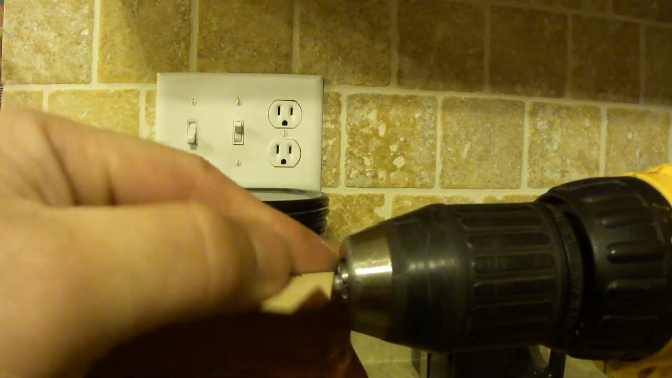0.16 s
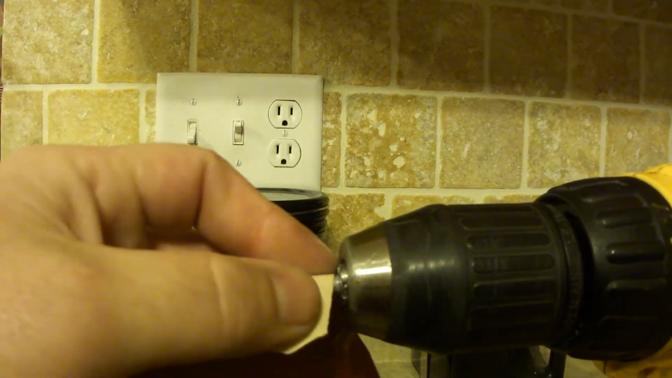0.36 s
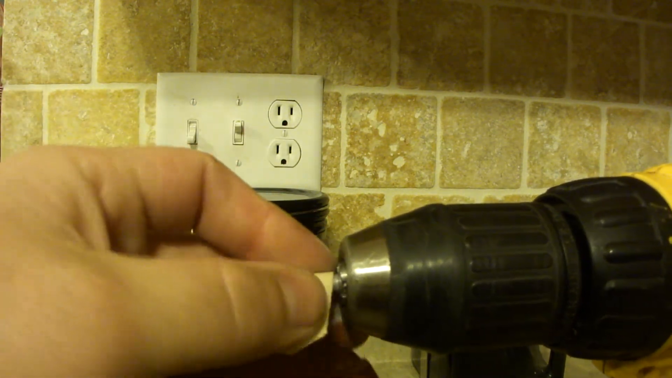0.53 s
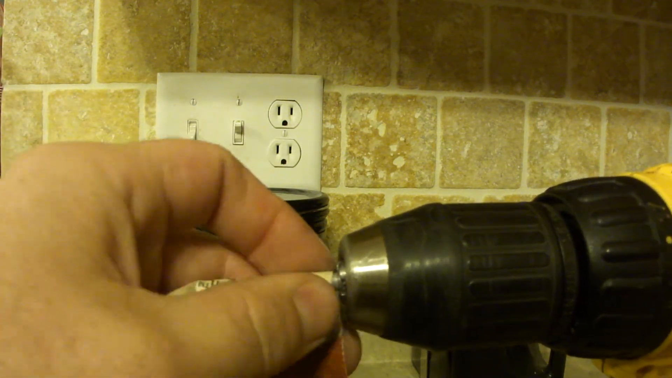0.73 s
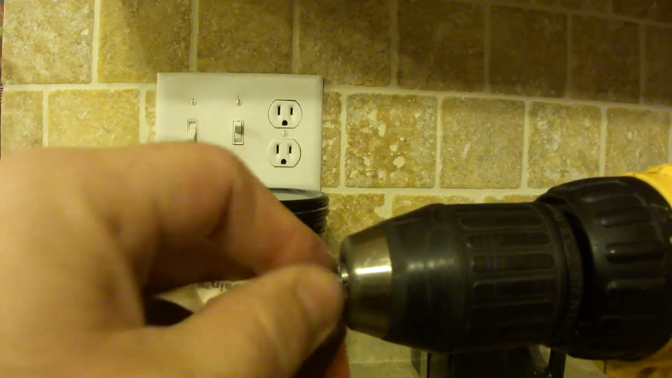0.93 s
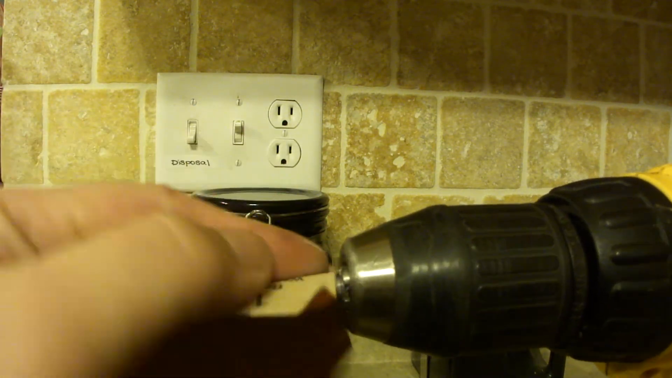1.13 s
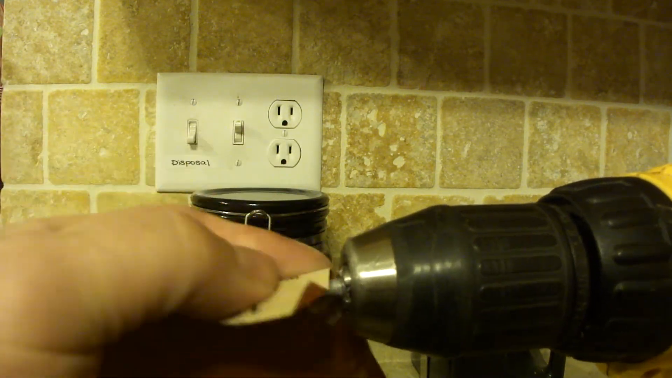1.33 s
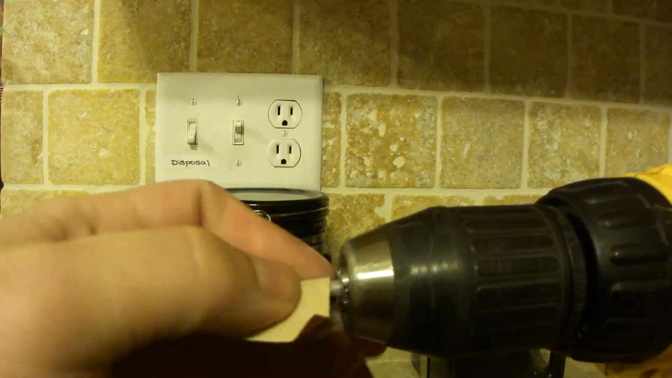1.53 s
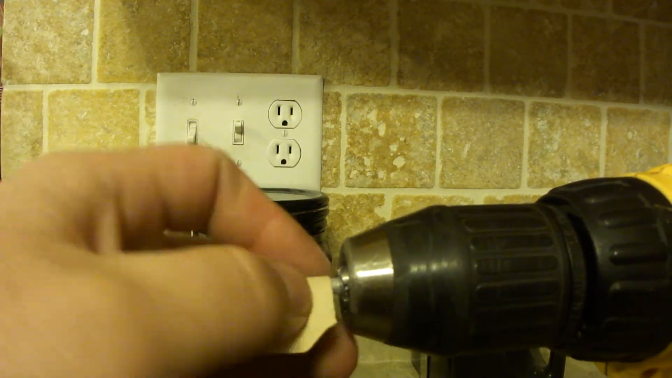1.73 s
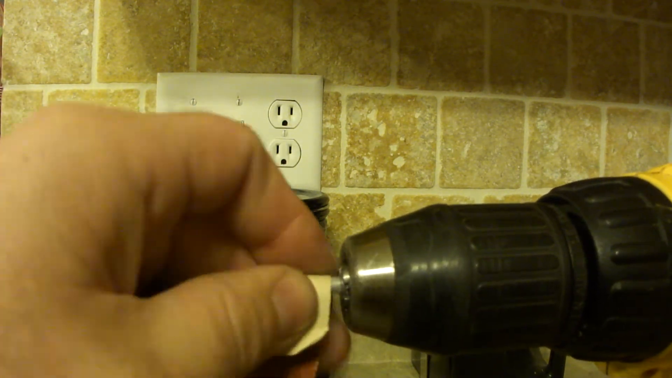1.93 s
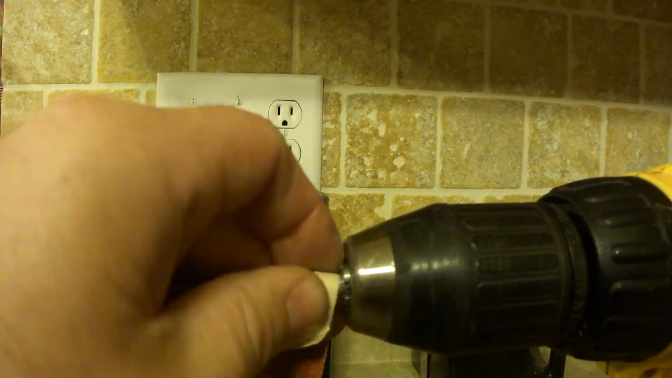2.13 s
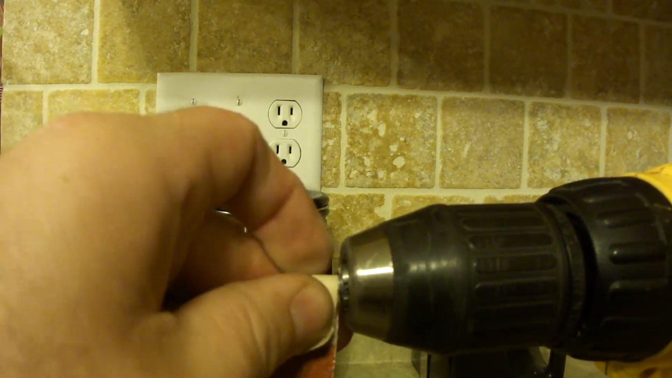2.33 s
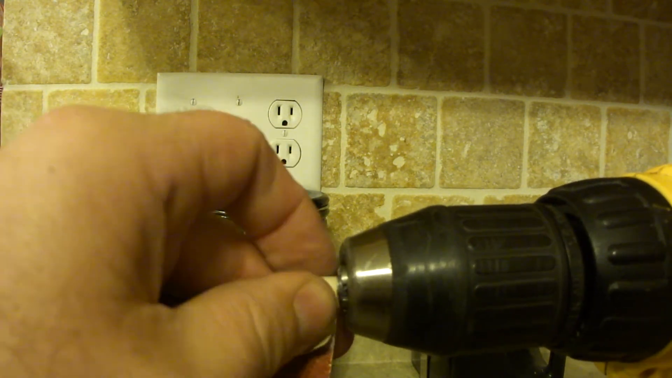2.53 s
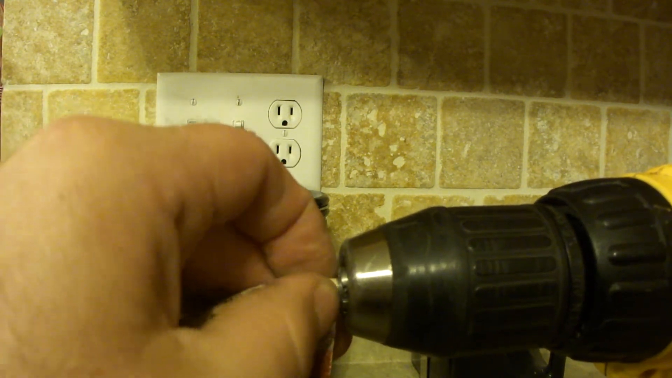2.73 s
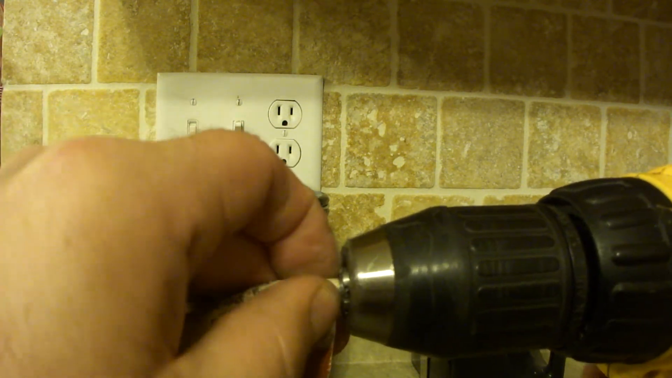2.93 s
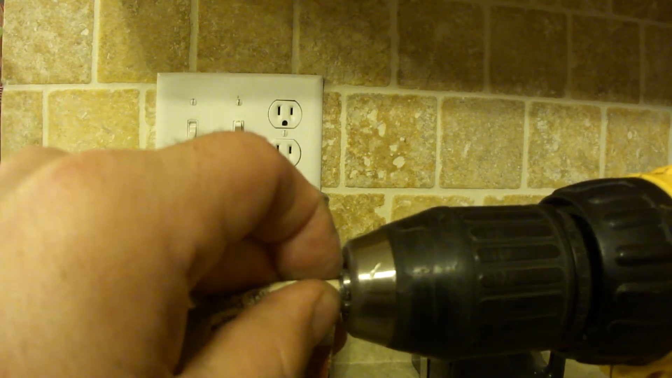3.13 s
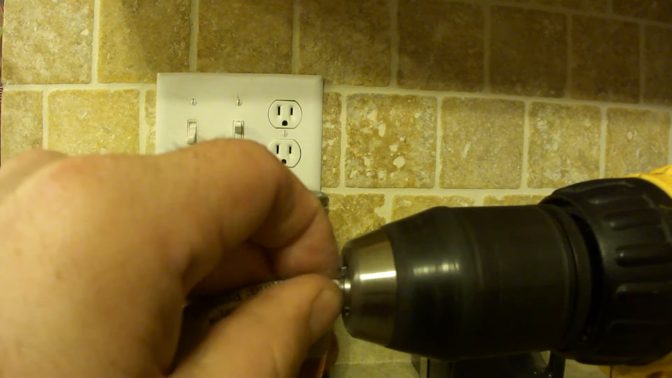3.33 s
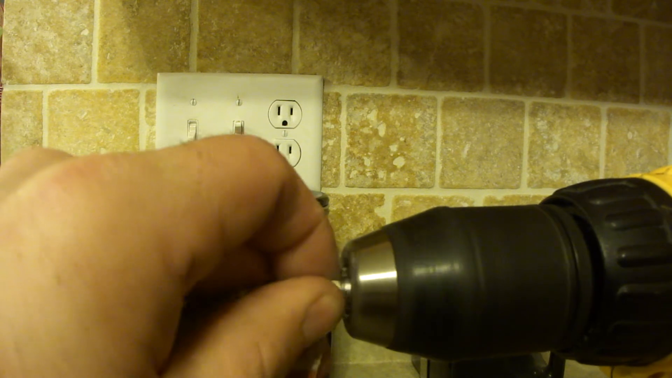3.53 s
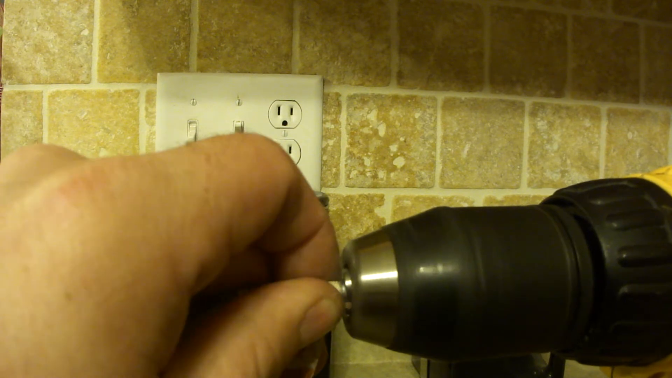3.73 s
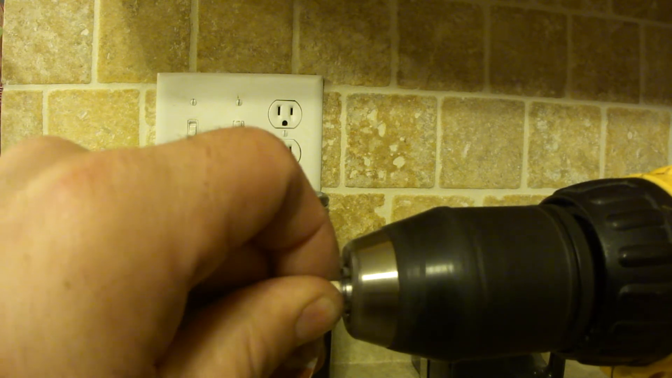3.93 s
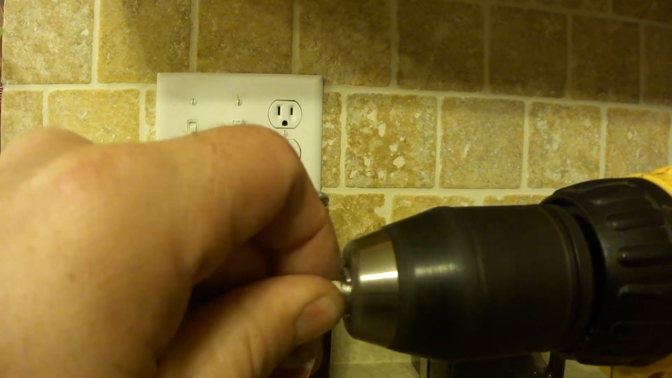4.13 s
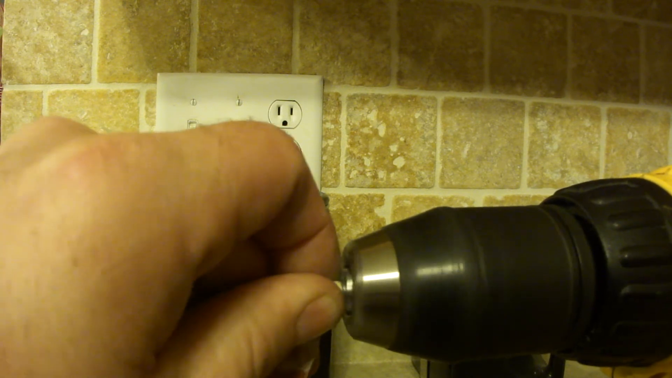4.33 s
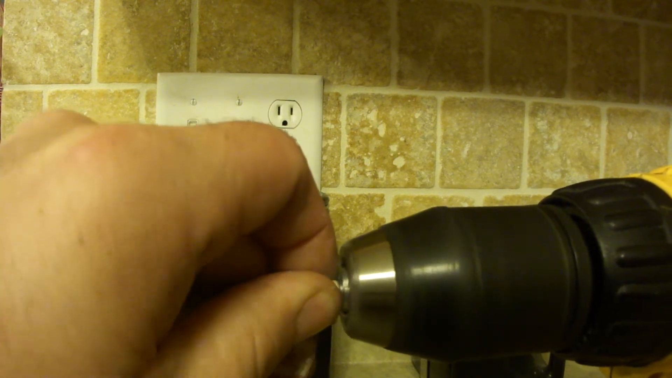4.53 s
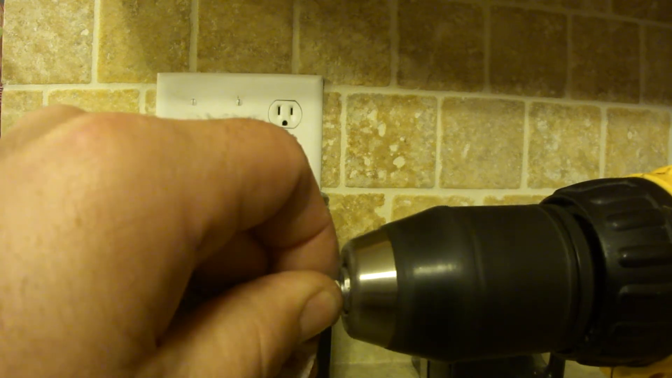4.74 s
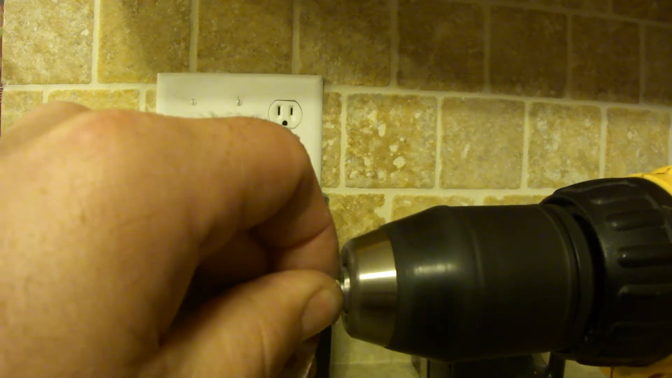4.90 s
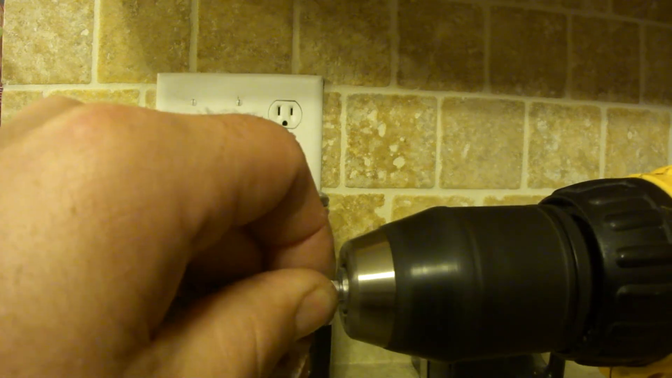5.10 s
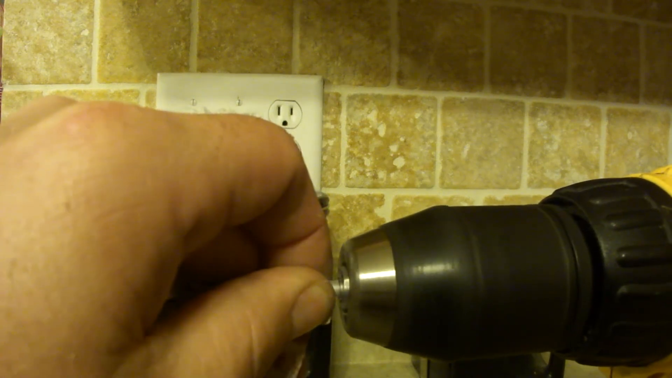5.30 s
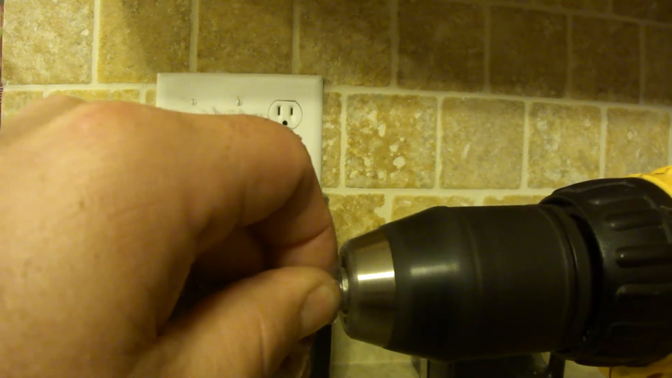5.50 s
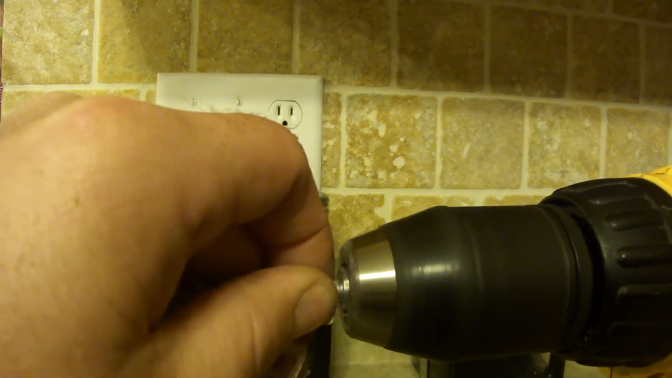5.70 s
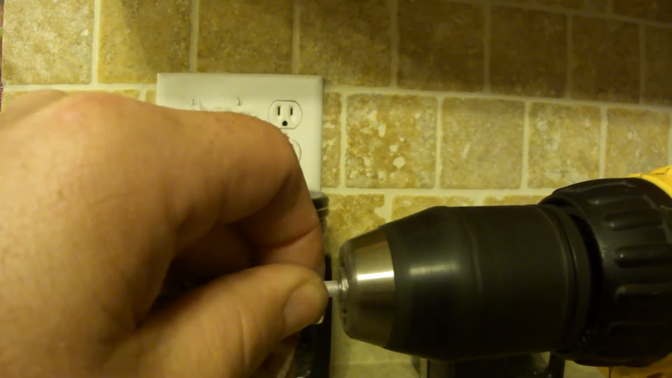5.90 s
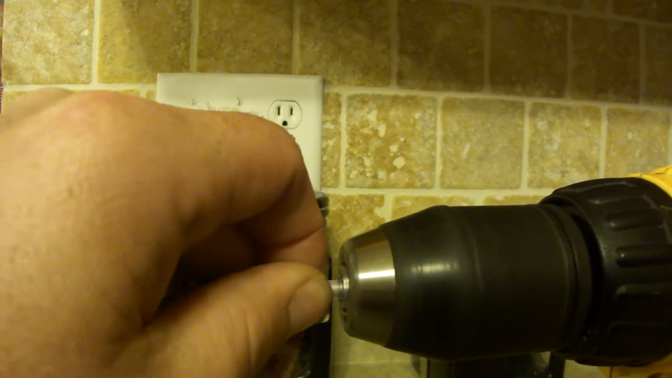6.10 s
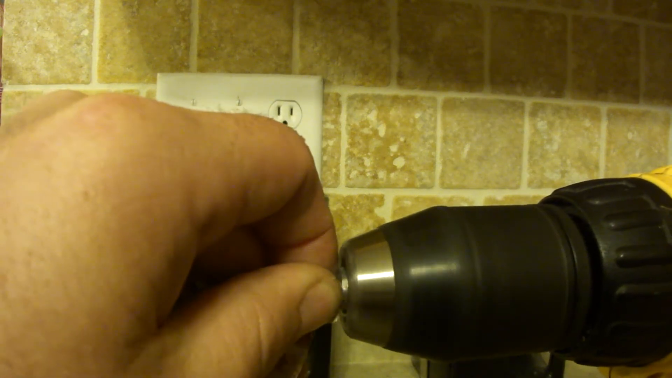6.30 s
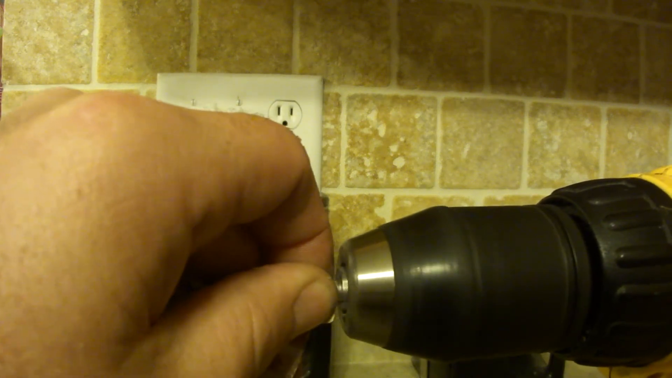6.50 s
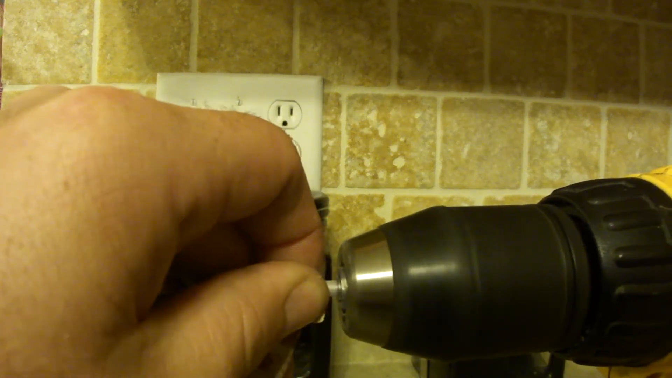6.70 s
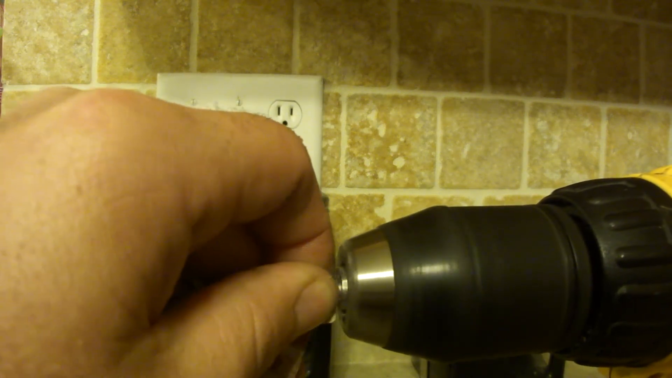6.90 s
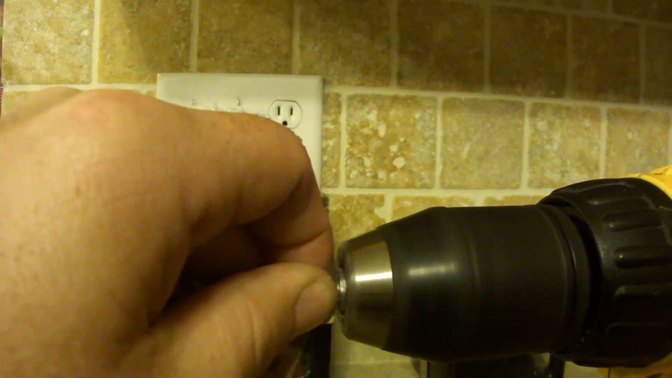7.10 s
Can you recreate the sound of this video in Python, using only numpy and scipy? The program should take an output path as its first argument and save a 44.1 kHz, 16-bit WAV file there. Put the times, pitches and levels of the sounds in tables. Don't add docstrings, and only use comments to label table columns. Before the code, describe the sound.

Sandpaper rustles, scratches and snaps in fingers close up, then a cordless drill clicks, rattles and whines up in steps to full speed.

```python
import sys
import numpy as np
from scipy import signal
from scipy.fft import rfft, irfft, next_fast_len
from scipy.io import wavfile
from scipy.ndimage import uniform_filter1d

SR = 44100
rng = np.random.default_rng(int(sys.argv[2]) if len(sys.argv) > 2 else 0)


def wrap_up_sound(samples):
    columns = np.atleast_2d(samples).T
    tamed = np.clip(columns, -1, 1)
    steps = np.round(tamed * 32767).astype(np.int16)
    wavfile.write(sys.argv[1], SR, steps)


def to_linear_factor(level_db):
    exponent = np.asarray(level_db, float) / 20
    return 10 ** exponent


N = 315438
TIME = np.arange(N) / SR
START_S = 3.255
PORTS = np.array([[.5], [-.5]])

# frequency in Hz, level in dB per Hz.
PAPER = [(60, -63), (200, -11), (400, -7.5), (800, -4), (1400, 0), (2200, -4.5), (2800, 3), (4000, -2.5),
         (5500, -34)]
# frequency in Hz, gain in dB.
MIC = [(40, -13.5), (200, 8.5), (2300, 3), (2600, -5.5), (2850, -17.5), (3700, -14), (4550, -4), (5250, -1),
       (5600, 7), (10000, 18.5), (11000, 8), (11650, -11.5), (11800, -56), (16000, -63)]


def unit(x):
    return x / np.sqrt(np.mean(x ** 2) + 1e-20)


def along(points, hz):
    f, *v = np.transpose(points)
    return np.squeeze([np.interp(np.log(hz + 1), np.log(f + 1), c) for c in v])


def curves(rows, fade=0.0069):
    s, *cols = np.transpose(rows)
    gate = np.clip(np.minimum(TIME - s[0], s[-1] + 3 * fade - TIME) / fade, 0, 1)
    return [np.interp(TIME, s, c) for c in cols] + [gate]


def wobble(rate):
    knots = rng.standard_normal(int(N * rate / SR) + 2)
    return np.interp(TIME * rate, np.arange(len(knots)), knots)


def filtered(x, response):
    m = next_fast_len(N + 8192)
    return irfft(rfft(x, m) * response(np.fft.rfftfreq(m, 1 / SR)), m)[..., :N]


def resonance(f, center, width):
    return 1j * f * width / (center * center - f * f + 1j * f * width)


def hiss(spectrum, grain_db=0):
    grains = to_linear_factor(grain_db * wobble(900)) * rng.standard_normal(N)
    return unit(filtered(grains, lambda hz: to_linear_factor(along(spectrum, hz))))


def sweep(hz):
    return np.sin(2 * np.pi * np.cumsum(hz) / SR)


def kitchen():
    # frequency in Hz, width in Hz, level in dB.
    hum = [(60, 39, -0.5), (120, 14, 1), (355, 48, 4.5), (395, 15, -20), (550, 60, 1), (765, 38, 6),
           (935, 26, 4), (1390, 230, -34)]
    shared, own = rng.standard_normal(N), rng.standard_normal((2, N))

    def peaks(f):
        return np.sqrt(sum(np.abs(to_linear_factor(db) * resonance(f, c, w)) ** 2 for c, w, db in hum))

    return to_linear_factor(-58) * unit(filtered(shared + 1.2 * own, peaks))


def rubbing():
    # time in seconds, pressure in dB.
    rub = [(0, -44.5), (.42, -49.5), (.7, -43), (.85, -47), (1.03, -38.5), (1.3, -48), (1.41, -38),
           (1.58, -49), (1.89, -36.5), (2.04, -50), (2.36, -54), (2.74, -50.5), (3.05, -46.5), (3.3, -39.5)]
    # frequency in Hz, level in dB per Hz.
    grit = [(2500, -46), (4000, -8), (5500, 4.5), (6600, 2), (8000, -4.5), (9500, -30), (11000, -19),
            (14000, 19.5)]
    # start in seconds, length in seconds, level in dB.
    scrapes = [(0.265, 0.062, -41), (.45, 0.079, -42.5), (.583, .034, -42), (0.651, 0.012, -41),
               (0.798, 0.075, -45.5), (1.13, 0.014, -43.5), (1.222, 0.038, -29.5), (1.265, 0.026, -32),
               (1.342, 0.11, -41), (1.495, 0.099, -42), (1.707, 0.087, -42.5), (1.82, .014, -42),
               (1.904, .05, -41), (1.99, 0.05, -43.5), (2.243, 0.066, -46.5), (2.528, 0.03, -46),
               (2.699, 0.015, -46.5), (3.113, 0.03, -45)]
    usual_db = -47
    rustle_db, moving = curves(rub, fade=0.00069)
    scratch_db = usual_db - 3.0 + 1.2 * (rustle_db - usual_db)
    clumps = 1.5 * wobble(45)
    rustle = to_linear_factor(rustle_db + clumps - 7) * hiss(PAPER, grain_db=1.0)
    scratch = to_linear_factor(scratch_db + clumps - 2.5) * hiss(grit, grain_db=3.5)
    out = moving * (rustle + scratch)

    coarse = to_linear_factor(4.3 * wobble(260) + 2.3 * wobble(60.24))
    stroking = unit(coarse * hiss(PAPER, grain_db=3.5))
    stroking = stroking + to_linear_factor(2.0) * unit(coarse * hiss(grit, grain_db=-2.5))
    for s, length, db in scrapes:
        stroke = np.sin(np.pi * np.clip((TIME - s) / length, 0, 1)).clip(0) ** 0.36
        out += to_linear_factor(db) * stroke * stroking
    return out


def dying(t, life_s):
    return to_linear_factor(-60 * t / life_s) + 1.53 * to_linear_factor(-60 * t / 0.0051)


def peaked(x):
    return x / np.abs(x).max()


def clicks():
    # start in seconds, knock in dB, knock pitch in Hz, snap in dB.
    contacts = [(0.163, -38.5, 1730, -31), (0.261, -29.5, 1470, -21.5), (0.395, -30, 1000, -57),
                (0.457, -38, 1380, -50), (0.502, -39, 1310, -27.5), (0.569, -33.5, 711, -29),
                (0.627, -34, 1550, -11), (0.683, -27, 1400, -15), (0.711, -28, 2140, -35),
                (0.793, -19, 1310, -3.5), (0.91, -38, 721, -42), (0.938, -17, 2570, -44),
                (1.134, -26, 999, -26.5), (1.236, -24, 1340, -26), (1.275, -24.5, 2130, -25),
                (1.305, -30.5, 1250, -24), (1.352, -29.5, 680, -42), (1.513, -36, 1340, -50),
                (1.604, -31, 1800, -22), (1.653, -39, 1830, -28.5), (1.721, -30.5, 1430, -49),
                (1.742, -30, 900, -43), (1.757, -23.5, 2170, -45), (1.852, -24, 766, -17),
                (2.106, -38, 1010, -31), (2.263, -38, 1300, -20), (2.283, -40, 990, -26),
                (2.53, -45, 956, -38), (2.673, -40, 2170, -20), (2.899, -31, 859, -24)]
    # start in seconds, knock in dB, knock pitch in Hz, snap in dB.
    catches = [
        (2.959, -37.5, 1200, -29),
        (3.113, -37, 885, -35),
        (3.192, -39, 800, -44),
        (3.221, -29, 760, -23),
        (3.288, -28, 1300, -19.5),
        (3.335, -19, 905, -12),
        (3.371, -26, 900, -17),
        (3.412, -25, 880, -9),
        (3.444, -25, 2000, -9),
        (3.72, -19, 1930, -15),
    ]
    # frequency in Hz, level in dB per Hz.
    snap_colour = [(2500, -28), (3500, 7.5), (5000, 5), (6600, 4.5), (8000, -3), (10000, -15), (11500, -6),
                   (14000, 5.5)]
    # start in seconds, pitch in Hz, level in dB.
    thumps = [
        (.6, 55, -60),
        (1.24, 91, -62),
        (3.26, 71.6, -51),
    ]
    knock = filtered(hiss(PAPER), lambda f: f ** 2 / (f ** 2 + 450 ** 2))
    snap = hiss(snap_colour)
    out, t = np.zeros((2, N)), TIME[:SR // 8]
    ring_s = .04
    for rows, pan_db in ((contacts, 1), (catches, -1)):
        for s, knock_db, hz, snap_db in rows:
            at = slice(round(s * SR), round(s * SR) + len(t))
            blow = dying(t, ring_s) * (1 - np.exp(-t / 0.00049)) * knock[at]
            pitched = 1.87 * signal.lfilter(*signal.iirpeak(hz, 9.6, SR), blow)
            body = to_linear_factor(knock_db) * peaked(blow + pitched)
            crack = dying(t, 0.69 * ring_s) * (1 - np.exp(-t / 0.00019)) * snap[at]
            edge = to_linear_factor(snap_db - 8.5) * peaked(crack)
            out[:, at] += to_linear_factor(3.5) * (body + edge) * to_linear_factor(PORTS * pan_db)
    for s, hz, db in thumps:
        out[:, round(s * SR):][:, :len(t)] += to_linear_factor(db) * np.sin(2 * np.pi * hz * t) * np.hanning(len(t))
    return out


def trigger():
    # start in seconds, from Hz, to Hz, length in seconds, level in dB.
    squeaks = [
        (2.99, 9900, 11000, .1, -86),
        (3.06, 7460, 8050, .06, -77),
        (3.124, 7240, 7540, .07, -83),
    ]
    out = np.zeros(N)
    for s, from_hz, to_hz, length, db in squeaks:
        u = np.clip((TIME - s) / length, 0, 1)
        swell = np.sqrt(np.sin(np.pi * u).clip(0))
        out += to_linear_factor(db) * swell * sweep(to_hz - (to_hz - from_hz) * (1 - u) ** 2)
    return out


def speed():
    # start in seconds, slot tone gained in Hz, catch-up time in seconds.
    squeezes = [
        (3.2035, 221.6, .0237),
        (3.456, 72.1, .0279),
        (3.9097, 303.7, .1035),
        (4.314, 360.3, .1161),
    ]
    creep, slower = .3133, 3.82
    slot_hz = 0
    for s, hz, lag in squeezes:
        since = (TIME - s).clip(0)
        missing = (1 - creep) * np.exp(-since / lag) + creep * np.exp(-since / (lag * slower))
        slot_hz = slot_hz + hz * (1 - missing)
    shaft_hz = slot_hz.clip(150) / 5
    return shaft_hz, 20 * np.log10(shaft_hz / shaft_hz[-1])


def switching():
    # time in seconds, pitch in Hz, level in dB.
    chops = [(3.22, 6930, -58), (3.25, 7240, -60), (3.33, 7300, -56), (3.5, 7400, -62), (3.89, 7420, -62),
             (3.9, 6640, -56), (3.94, 7050, -55), (3.98, 7500, -56), (4.35, 7450, -66)]
    pwm_hz, pwm_db, chopping = curves(chops)
    return chopping * to_linear_factor(pwm_db + 3 + 4 * wobble(66)) * sweep(pwm_hz + 90 * wobble(200))


def tone(multiple, turn, db, shake):
    return to_linear_factor(db + shake * wobble(25)) * np.sin(multiple * turn + rng.uniform(0, 2 * np.pi))


def motor_whine(turn, speed_db):
    # multiple of the shaft turn, dB at full speed, dB per dB of speed.
    whine = [(2, -43, 12), (5, -28, 1.0), (10, -43, -.62), (12, -29.5, 1.1), (15, -57.5, -2)]
    return sum(tone(k, turn, db + grows * speed_db, 1.33) for k, db, grows in whine)


def case_rumble(speed_db):
    # frequency in Hz, level in dB per Hz.
    case = [(60, -5.5), (150, -13), (400, -2.5), (900, 8), (1400, 11), (2000, 6), (2600, 5.5), (3500, 4.5),
            (5000, -13), (7000, -54)]
    case_db = -25 + 0.81 * np.minimum(speed_db + 1.5, 0)
    return to_linear_factor(case_db - 3 + 0.32 * wobble(28)) * hiss(case, grain_db=-1.5)


def slack_shudder():
    swell = to_linear_factor(-43.5) * np.exp(-((TIME - 3.34) / 0.15) ** 2) * np.clip((TIME - 3.23) / 0.026, 0, 1)
    return swell * hiss([(60, -18), (200, -8), (450, -1), (900, -1), (1500, -41)], grain_db=1.5)


def fan_rush(turn, chuck_turn, speed_db, fan):
    slack_db = 6.5 * np.exp(-((TIME - 3.38) / .075) ** 2)
    fan_db = -20.5 + 1.51 * np.minimum(speed_db + 1.5, 0) + slack_db
    pulse = (1 + 0.025 * np.sin(chuck_turn)) * (1 + 0.14 * np.sin(2 * turn))
    vents = 0.95 * hiss(fan, grain_db=0.5) + 0.4 * np.array([hiss(fan), hiss(fan)])
    return to_linear_factor(fan_db + 10.0 + 0.62 * wobble(7.4)) * pulse * vents


def drill():
    # multiple of the shaft turn, dB at full speed.
    shaft = [(1, -36.5), (3, -19.5), (4, -25), (6, -11.5), (7, -11), (8, -15), (9, -17), (11, -15)]
    # multiples of the shaft turn, and their levels in dB.
    mesh = [.686, 9.79, 35.85, 36.98, 43.7, 47.25]
    mesh_db = [-31.5, -10, -13, -10, -11, -7.5]
    # multiple of the shaft turn, dB at full speed.
    fan_orders = [(24, -21.5), (29, -31), (31, -21), (32, -27), (36, -10), (38, -11), (39, -14), (40, -24),
                  (43, -22), (44, -29), (46, -13), (48, -5), (50, -3.5), (52, -21)]
    # frequency in Hz, level in dB per Hz.
    fan = [(1500, -11), (3000, 8.5), (4500, 10.5), (6000, -3), (7500, -5), (9200, -8.5), (10500, -12),
           (14000, 19)]
    # frequency in Hz, width in Hz, lift in dB.
    housing = [(366, 50, 7), (870, 90, 4), (1320, 120, 3), (1490, 70, 2), (1875, 45, 6.5), (5930, 250, 5),
               (6870, 150, 3), (7460, 250, 5), (8390, 150, 3), (8800, 100, 6), (9190, 120, 6)]
    shaft_hz, speed_db = speed()
    turn = 2 * np.pi * np.cumsum(shaft_hz * (1 + .001 * wobble(25))) / SR
    chuck_turn = turn / 5.35

    orders = [*shaft, *fan_orders, *zip(mesh, mesh_db)]
    orders = [(k, db - along(MIC, k * shaft_hz[-1])) for k, db in orders]
    gears = sum(tone(k, turn, db, 2.8) for k, db in orders if k < 12)
    gears = to_linear_factor(1.6 * speed_db - 24.5) * gears
    blades = sum(tone(k, turn, db, 2.66) for k, db in orders if k > 12)
    blades = to_linear_factor(3.3 * speed_db - 25) * blades
    blades = filtered(blades, lambda hz: to_linear_factor(along(fan, hz)))

    tones_on = np.clip((TIME - 3.3) / .36, 0, 1) ** 1.54
    running = np.clip((TIME - START_S) / .08, 0, 1)
    load = 1 + 0.4 * np.sin(chuck_turn + 1.0)
    noise = case_rumble(speed_db) + fan_rush(turn, chuck_turn, speed_db, fan)
    inside = tones_on * load * (gears + blades) + running * to_linear_factor(-0.84) * noise

    def shell(f):
        return 1 + sum((to_linear_factor(db) - 1) * resonance(f, c, w) for c, w, db in housing)

    return tones_on * motor_whine(turn, speed_db) + filtered(inside, shell) + switching() + slack_shudder()


def tiles(x):
    # frequency in Hz, t60 in seconds, level in dB.
    walls = [(198, 0.25, -15), (1160, 0.11, -7.5), (2460, 0.031, -4.5), (4840, 0.13, -6), (11000, 0.45, -5)]
    hz, t, z = signal.stft(rng.standard_normal((2, SR // 3)), SR, nperseg=256)
    t60 = along(walls, hz)[0][:, None]
    decay = to_linear_factor(-60 * t / t60)
    z = z * decay / np.linalg.norm(decay, axis=1, keepdims=True)
    tail = signal.istft(z, SR, nperseg=256)[1]
    late = np.pad(x, (130, 0))[None]
    wet = signal.fftconvolve(late, tail / np.linalg.norm(tail[0]), axes=1)[:, :N]
    return filtered(wet, lambda f: to_linear_factor(along(walls, f)[1]))


def stirred_air():
    shaking = to_linear_factor(-92) + to_linear_factor(-64 + 0.35 * speed()[1]) * (TIME > START_S)
    return shaking * np.array([hiss([(20, -22), (60, -7), (130, -2), (300, -21)]) for _ in "LR"])


def placed(x, pan, lag):
    return filtered(x, lambda hz: to_linear_factor(along(pan, hz) * PORTS) * np.exp(-2j * np.pi * hz * lag * PORTS / SR))


def scene():
    # frequency in Hz, left over right in dB.
    sideways = [(60, -12), (110, 2.5), (190, 1), (340, -1.5), (610, 0.5), (1080, -0.5), (1920, -2.5),
                (3430, -1.5), (6110, -3), (10900, -2.0)]
    hands, taps, tool = rubbing() + trigger(), clicks(), drill()
    near = placed(hands, [(300, .2), (9000, 0.38)], lag=-0.85) + taps + placed(tool, sideways, lag=1.15)
    return near + tiles((tool + .6 * taps).mean(axis=0) + hands) + kitchen() + stirred_air()


def low_pass(x):
    return signal.sosfilt(signal.butter(12, 14700, fs=SR, output="sos"), x)


def record(dry):
    # frequency in Hz, width in Hz.
    notch = [(2995, 225), (4000, 417), (4890, 115), (5050, 300)]

    def notches(f):
        return np.prod([(c * c - f * f) / (c * c - f * f + 1j * f * w) for c, w in notch], axis=0) ** 2

    def edges(f):
        return f ** 2 / (f ** 2 + 40 ** 2) * to_linear_factor(-9 * (f > 11900))

    heard = filtered(dry, lambda f: to_linear_factor(along(MIC, f)) * notches(f))
    snatches = uniform_filter1d(1. * (wobble(16) > .45), size=600)
    thin_band = snatches * filtered(heard, lambda f: to_linear_factor(27) / (1 + ((f - 13930) / 90) ** 6))
    return low_pass(filtered(heard, edges) + thin_band)


dry = scene()
out = record(dry)
wrap_up_sound(out)
```